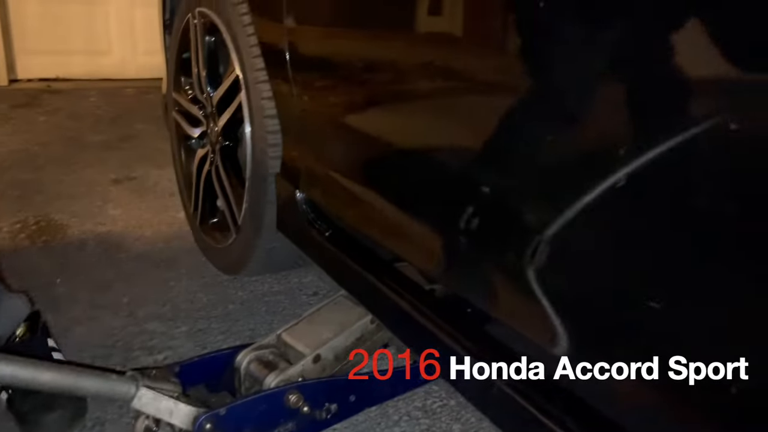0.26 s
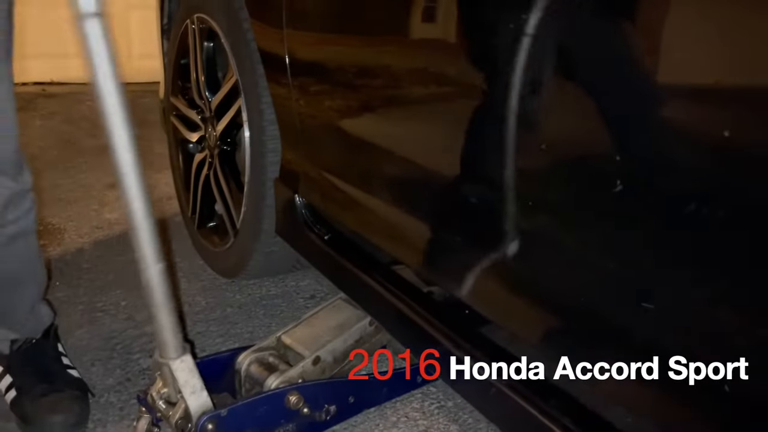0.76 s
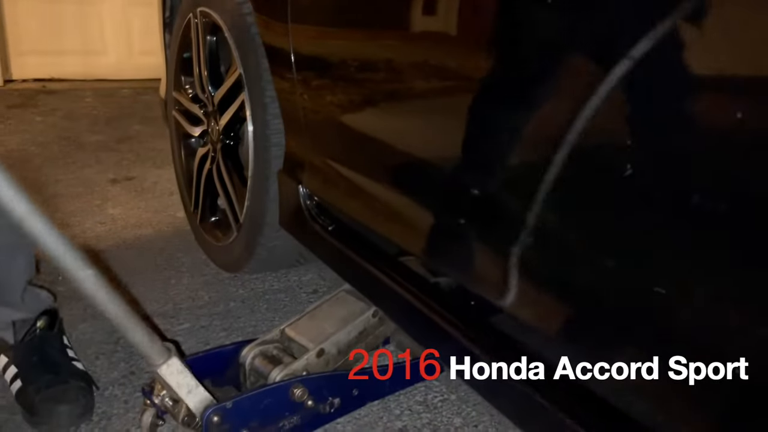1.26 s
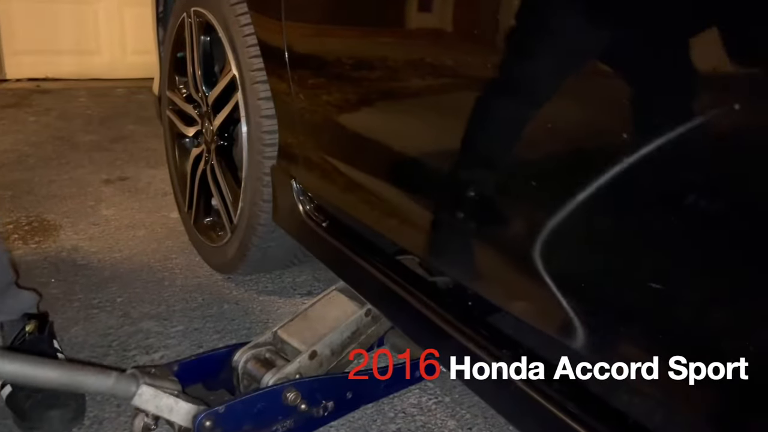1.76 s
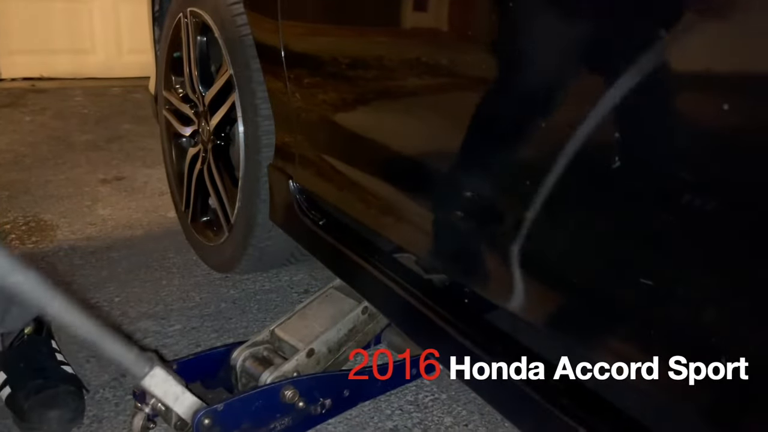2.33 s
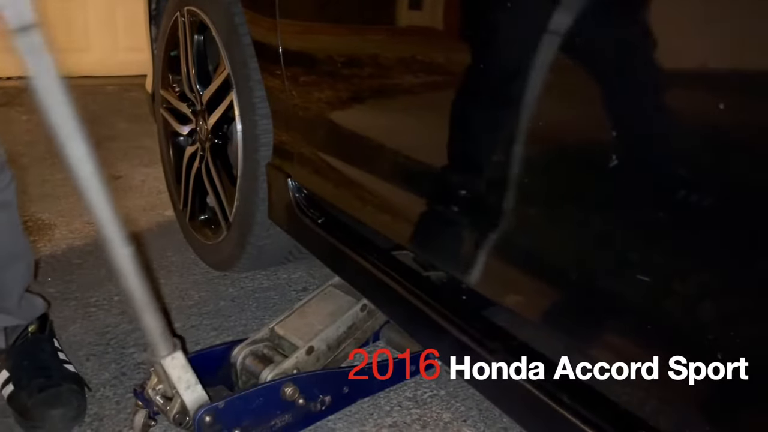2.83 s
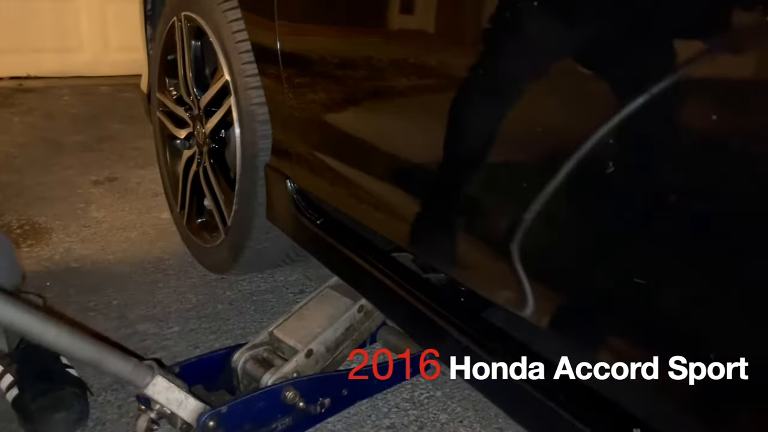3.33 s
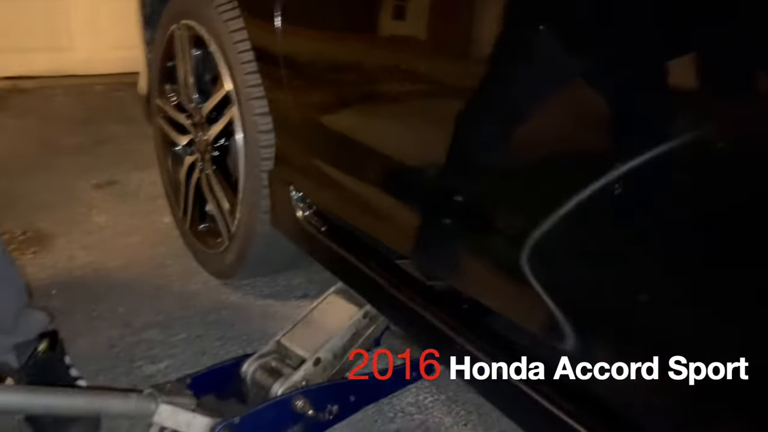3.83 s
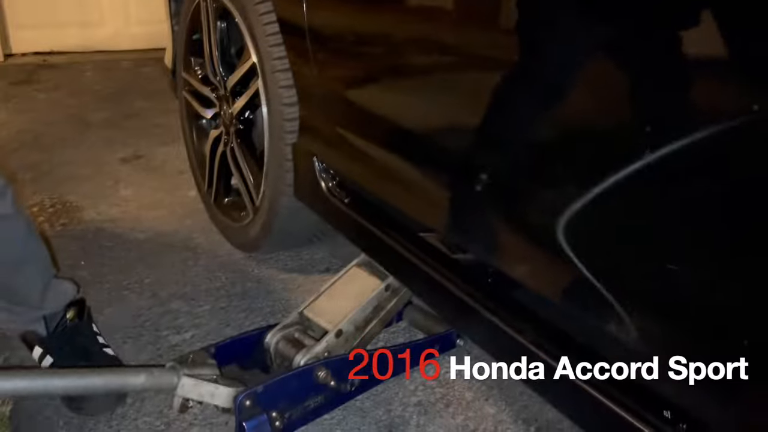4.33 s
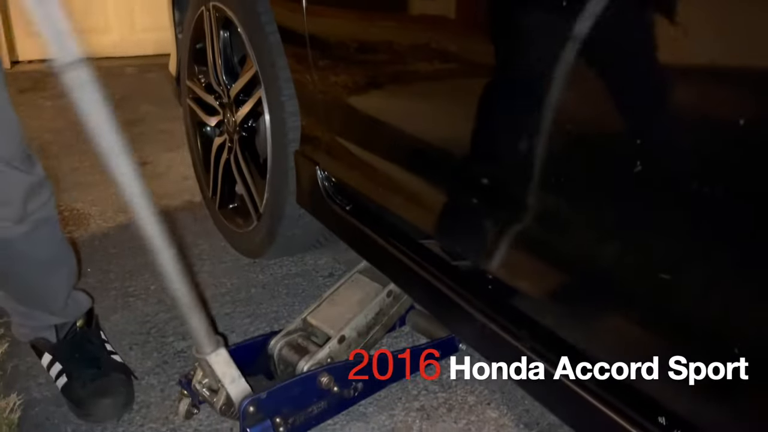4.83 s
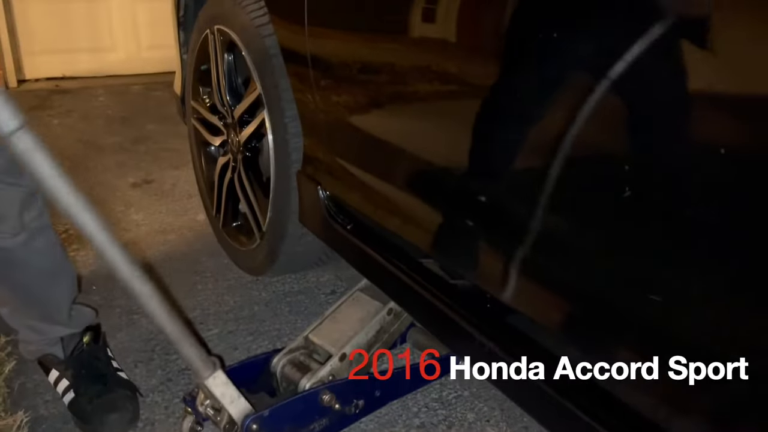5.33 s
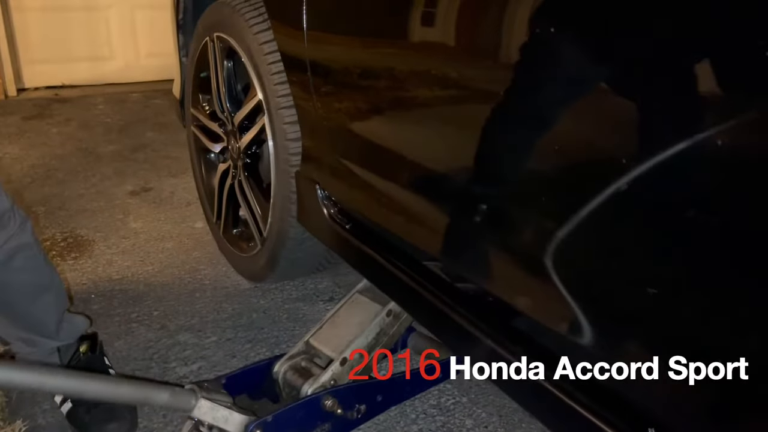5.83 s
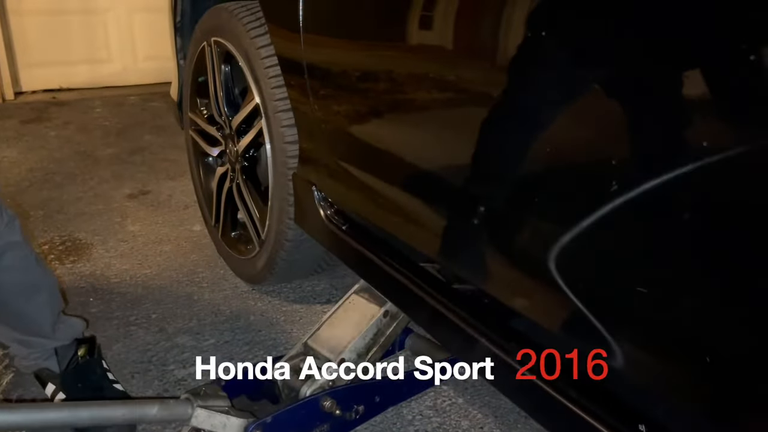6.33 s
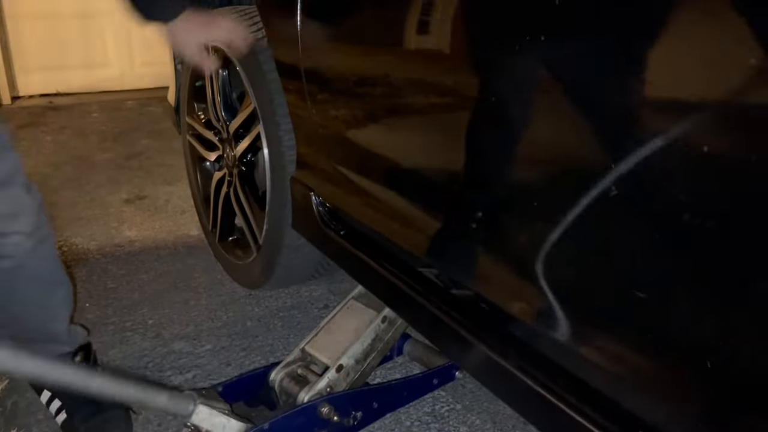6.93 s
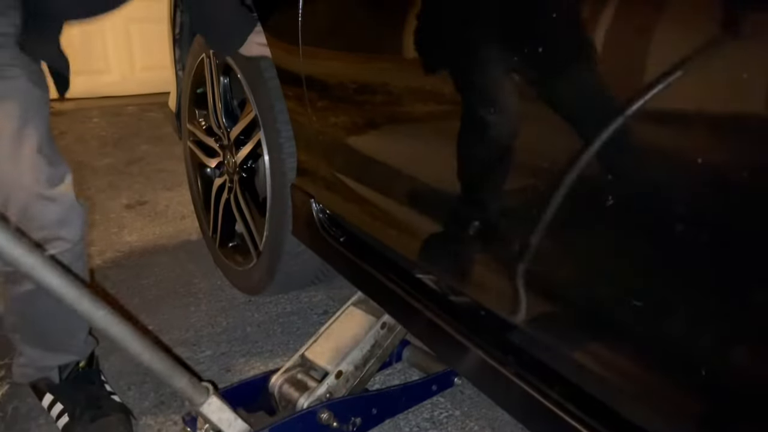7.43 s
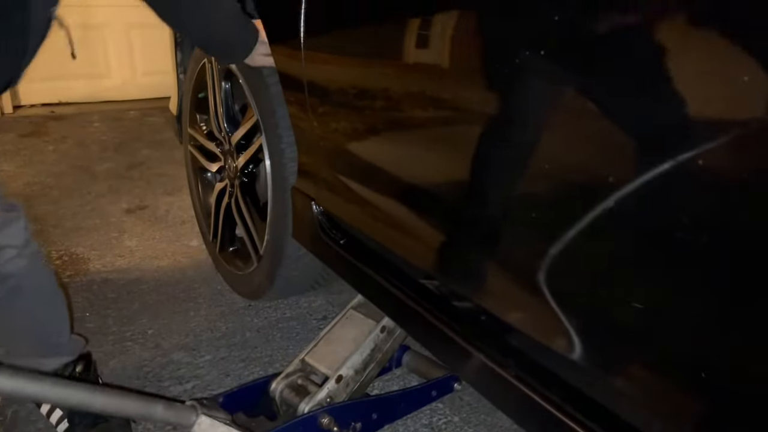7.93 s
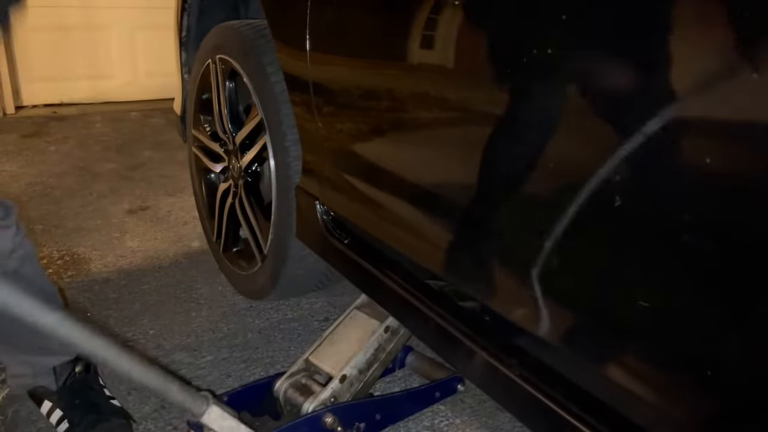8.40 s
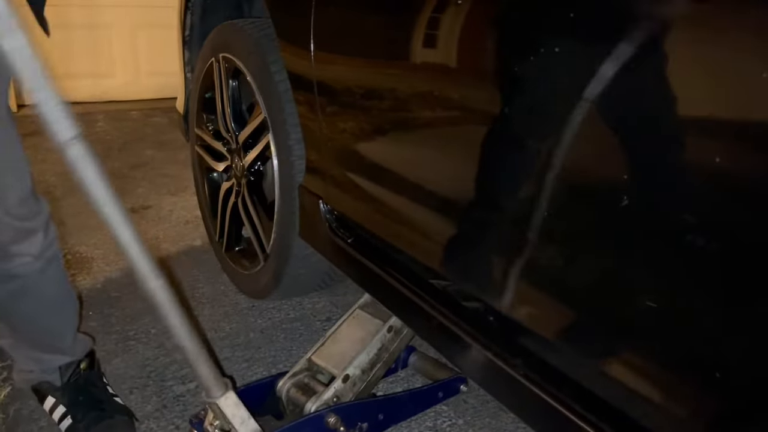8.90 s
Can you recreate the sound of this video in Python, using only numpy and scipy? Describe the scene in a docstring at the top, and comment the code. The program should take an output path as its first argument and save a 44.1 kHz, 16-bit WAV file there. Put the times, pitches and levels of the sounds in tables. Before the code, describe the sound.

Close metallic knocks, ticks and gritty oil hisses from a hand-pumped car jack, one heavy clank, then a shoe scraping on asphalt.

```python
"""A hydraulic floor jack is pumped under a car on a driveway, close by, over the far rumble of a town at night.
Its steel handle knocks and rings (noise bursts and decaying modes); once the saddle seats with a loud clank.
Oil hisses and spurts through the valves (grainy filtered noise), and the linkage ticks, clinks and pings.
Near the end a shoe grinds on gritty asphalt. The driveway adds a faint tail; the microphone dulls the top."""
import sys
import numpy as np
from scipy import signal
from scipy.fft import rfft, irfft, next_fast_len
from scipy.io import wavfile
from scipy.ndimage import uniform_filter1d

SR = 44100
rng = np.random.default_rng(int(sys.argv[2]) if len(sys.argv) > 2 else 0)


def dump_mix(stems):
    """Bounce the given channels to the path in sys.argv[1] as a 16-bit WAV at rate SR."""
    frames = np.atleast_2d(stems).T  # one column per channel
    limited = np.clip(frames, -1, 1)  # hard clip at full scale
    pcm = np.round(limited * 32767).astype(np.int16)
    wavfile.write(sys.argv[1], SR, pcm)


N = 403956
TIME = np.arange(N) / SR  # s, the whole scene
BLOW_TIME = np.arange(SR // 2) / SR  # s, half a second for one short sound


def undb(db):
    """Decibels to gain."""
    return 10 ** (np.asarray(db) / 20)


def unit(x):
    """Scale to rms 1."""
    return x / np.sqrt(np.mean(x ** 2))


def crest(x, size=180):
    """Scale a blow so that its loudest few milliseconds have rms 1."""
    power = uniform_filter1d(x.mean(0) ** 2, size)
    return x / np.sqrt(power.max())


def fade(t60):
    """Exponential decay by 60 dB in t60 seconds."""
    return np.exp(-np.log(1000) * BLOW_TIME / t60)


def swell(rise):
    """Soft onset with a time constant in seconds."""
    return 1 - np.exp(-BLOW_TIME / rise)


def colour(x, points, tilt_db=0):
    """Filter by (f/Hz, level/dB) points, tilted about the highest point by some dB an octave."""
    size = next_fast_len(x.shape[-1])
    octave = np.log2(np.maximum(np.fft.rfftfreq(size, 1 / SR), 1))
    hz, db = np.transpose(points)
    curve_db = np.interp(octave, np.log2(hz), db)
    # the tilt stops growing below the lowest point
    octaves_from_top = np.maximum(octave, np.log2(hz[0])) - np.log2(hz[-1])
    gain = undb(curve_db + tilt_db * octaves_from_top)
    return irfft(rfft(x, size) * gain, size)[..., :x.shape[-1]]


def noise(points, side_db, tilt_db=0, size=len(BLOW_TIME)):
    """Stereo noise of a given colour and side-to-mid level, closed off below its lowest point."""
    points = [(points[0][0] / 2, points[0][1] - 40), *points]
    mid, side = unit(colour(rng.standard_normal((2, size)), points, tilt_db))
    return mid + undb(side_db) * np.array([side, -side])


def pan(x, left_db):
    """Shift a sound to the left by a level difference between the channels."""
    return x * undb([[left_db / 2], [-left_db / 2]])


def walk(rate):
    """Random wander with rms 1, taking a new value some times a second."""
    k = int(SR / rate)
    steps = np.repeat(rng.standard_normal(N // k + 1), k)
    return unit(uniform_filter1d(steps, k)[:N])


def grain(depth_db, size=50, length=len(BLOW_TIME)):
    """Gain of a shower of uneven grains; size is the smoothing in samples (50 is about a millisecond)."""
    roughness = unit(uniform_filter1d(rng.standard_normal(length), size))
    return unit(undb(depth_db * roughness))


def add(out, s, sound):
    """Mix a sound in at a time in seconds."""
    i = int(s * SR)
    out[:, i:i + sound.shape[1]] += sound[:, :max(N - i, 0)]


def arch(start, length, power):
    """A movement that speeds up and slows down again, as a gain from 0 to 1."""
    progress = np.clip((TIME - start) / length, 0, 1)
    return np.maximum(np.sin(np.pi * progress), 0) ** power


def hold(start, length, attack, release):
    """Rise, hold until the length is over, release."""
    rise = np.clip((TIME - start) / attack, 0, 1)
    fall = np.clip(1 - (TIME - start - length) / release, 0, 1) ** 2
    return rise * fall


def ring(modes, scatter_db, spread, tilt_db=0, smear=1):
    """Struck steel: each blow weights the modes anew; a square blow (small smear) starts them nearly in step."""
    out = 0
    ears = np.array([[1], [-1]])
    for (hz, db, t60), (size, phase, lag) in zip(modes, rng.standard_normal((len(modes), 3))):
        angle = 2 * np.pi * (hz * BLOW_TIME + smear * phase) + spread * lag * ears
        gain = undb(db + scatter_db * size + tilt_db * np.log2(hz / modes[0][0]))
        out = out + gain * np.sin(angle) * fade(t60) * swell(.5 / hz)
    return crest(out)


# far town, low rumble: f/Hz, level/dB
RUMBLE_COLOUR = [(27, -45), (33, -12), (40, 1.5), (50, -0.5), (66, 1), (95, -1.5), (125, -2), (160, -8),
                 (200, -7.5), (260, -12.5), (330, -22), (420, -32), (600, -38), (1000, -72)]
# far roads, wide rush: f/Hz, level/dB
ROAD_COLOUR = [(200, -16.5), (400, -1.5), (550, -2.5), (800, 1.5), (1100, -2.5), (1500, -7), (2200, -13),
               (3000, -24.5), (4500, -34), (7000, -44), (12000, -55)]
# gain on the side signal of the town: f/Hz, level/dB
TOWN_WIDTH = [(60, -31), (110, -17.5), (200, -9), (350, -6), (630, -4), (1140, 2), (2060, -2.5), (3720, -4),
              (6700, -12), (12100, 17)]
# the rumble slowly recedes and wanders; the rush of the roads is steady
RUMBLE_DB, RUMBLE_FALL_DB_PER_S, RUMBLE_WANDER_DB, ROAD_DB = -29.5, 0.2034, 0.03, -43.5


def town():
    """Far-off noise: a low rumble, nearly alike in both channels, under the wide rush of far roads."""
    rumble_db = RUMBLE_DB - RUMBLE_FALL_DB_PER_S * TIME + RUMBLE_WANDER_DB * walk(1.99)
    rumble = noise(RUMBLE_COLOUR, side_db=-0.5, size=N) * undb(rumble_db)
    road = noise(ROAD_COLOUR, side_db=1, size=N) * undb(ROAD_DB)
    left, right = rumble + road
    mid = (left + right) / 2
    side = colour((left - right) / 2, TOWN_WIDTH)
    return pan(mid + np.array([side, -side]), left_db=.5)


def driveway(x):
    """Car body, ground and garage door return a faint, dull tail."""
    tail_colour = [(150, -17), (600, -2), (2500, -7.0), (10000, -18.0)]
    tail = noise(tail_colour, side_db=-3.5) * swell(0.0056) * fade(0.12)
    tail /= np.sqrt(np.sum(tail ** 2) / 2)
    return x + undb(-17.0) * signal.fftconvolve(x, tail, axes=1)[:, :N]


# the sole slips and crushes grit: t/s, level/dB, t60/s
SLIPS = [(7.713, -45, 0.042), (7.775, -39.5, 0.038), (7.822, -33.5, .05), (7.838, -34, 0.026),
         (7.850, -31, 0.029), (7.963, -47.5, 0.1), (8.021, -33.5, 0.072), (8.115, -37.5, 0.048),
         (8.217, -47.5, 0.11)]
# grit under the sole: f/Hz, level/dB
GRIT_COLOUR = [(1200, -0.5), (2600, 3), (3300, -0.5), (3650, 1), (3900, 1), (4250, 4.5), (4650, 8.5),
               (4850, -10), (5120, 2), (5350, -6), (5900, -8), (7200, -8), (7900, 0.5), (8350, -8),
               (8900, -1.5), (11000, -12), (13000, -2.5)]
# the sole drags over grit
DRAG_S, DRAG_LENGTH_S, DRAG_DB, DRAG_ARCH = 7.69, 0.4, -52.5, 0.38


def shoe():
    """The sole drags over the asphalt, and each slip crushes a shower of grains."""
    drag = noise(GRIT_COLOUR, side_db=-4, size=N)
    drag = drag * grain(depth_db=2.5, size=90, length=N) * undb(3.3 * walk(45))
    out = drag * undb(DRAG_DB) * arch(DRAG_S, DRAG_LENGTH_S, DRAG_ARCH)
    for s, db, t60 in SLIPS:
        slip = noise(GRIT_COLOUR, side_db=-4) * grain(depth_db=1.0, size=70)
        add(out, s, undb(db) * crest(slip * swell(0.0013) * fade(t60)))
    return pan(out, left_db=2.0)


# the handle is raised and the pump draws oil:
# start t/s, length t/s, relative hiss level/dB, valve whistle level/dB
LIFT_STROKES = [(0.276, 0.89, -68, -74), (2.073, 1, -71.5, -73), (4.22, 0.44, -68, -83),
                (4.638, .38, -70.5, -67.5), (6.35, 0.2, -69, -62.5), (6.684, 0.16, -69, -62),
                (6.84, 0.6, -67.5, -81), (8.28, 0.47, -69, -60.5)]
# the handle is pushed down and the pump delivers oil: start t/s, length t/s, relative hiss level/dB
PUSH_STROKES = [(0.0, 0.25, -72), (1.2, 0.96, -75.5), (2.998, 0.59, -57), (5.1, 0.46, -69),
                (5.62, 0.27, -62.5), (7.58, 0.71, -68.5), (8.826, 0.36, -67.5)]
PUSH_ATTACK_S, PUSH_RELEASE_S = 0.072, 0.19
LIFT_ARCH, WHISTLE_ARCH = 0.36, 2.4  # hiss and whistle follow these powers of the handle's speed
SEEP_DB = -78.5  # relative level of the faint flow between strokes


def flow():
    """Strength of the oil flow: it swells with each lift and holds steady under each push."""
    drawn = sum(undb(db) * arch(s, length, LIFT_ARCH) for s, length, db, _ in LIFT_STROKES)
    pushed = sum(undb(db) * hold(s, length, PUSH_ATTACK_S, PUSH_RELEASE_S) for s, length, db in PUSH_STROKES)
    return np.hypot(drawn + pushed, undb(SEEP_DB))


def crackle(count=90):
    """Grit shifts under the jack's wheels in random specks, louder while oil is flowing."""
    out, effort = np.zeros((2, N)), flow()
    for when, size, pitch in rng.random((count, 3)):
        hz = 3800 * 3 ** pitch
        gain = effort[int(when * N)] * undb(5 + 11.6 * size ** 2)
        speck = noise([(hz / 2, -16), (hz, 0), (hz * 2.3, -12)], side_db=-7, size=2048)
        add(out, when * N / SR, gain * crest(speck * fade(0.011)[:speck.shape[1]]))
    return out


# oil hiss: f/Hz, level/dB
HISS_COLOUR = [(1760, -40), (3000, -6), (4270, -4), (5330, -5), (7500, -5.5), (8150, -1), (9240, 0),
               (10100, -10), (11200, -2), (12500, -20), (16300, -46), (22000, -120)]


def oil():
    """Oil fizzes through the pump, and a narrow valve whistles around the middle of each lift."""
    fizz = grain(depth_db=1.5, length=N) * undb(1.4 * walk(30))
    hiss = noise(HISS_COLOUR, side_db=-1.5, size=N) * fizz * flow() * undb(2.5)
    whistle_colour = [(6850, -25), (7090, -2), (7350, -19), (7700, -15), (8200, -10), (9000, -32)]
    whistle = noise(whistle_colour, side_db=-8, size=N)
    suction = sum(undb(db) * arch(s, length, WHISTLE_ARCH) for s, length, _, db in LIFT_STROKES)
    return pan(hiss + whistle * suction * undb(2.3 * walk(40)), left_db=1.5)


# the dry piston seal rubs: start t/s, length t/s, level/dB
SEAL_RUBS = [(4.046, 0.14, -51), (4.244, 0.061, -51.5)]
# seal: f/Hz, level/dB
SEAL_COLOUR = [(2600, -18), (4900, -17), (5400, -6), (5900, -14), (7300, -15), (8000, 3), (8500, -4),
               (9300, -5), (10300, -10), (11050, 3), (11900, -8), (13000, -22)]
RUB_ARCH = 0.98


def seal():
    """Fine stick and slip of the seal: a thin, squeaky hiss."""
    rubbing = sum(undb(db) * arch(s, length, RUB_ARCH) for s, length, db in SEAL_RUBS)
    return noise(SEAL_COLOUR, side_db=-3, size=N) * grain(depth_db=0.5, length=N) * rubbing


# the oil wheezes as the hardest push ends, and dies away
WHEEZE_S, WHEEZE_DB, WHEEZE_RISE_S, WHEEZE_T60_S = 3.62, -49, .07, 0.59


def wheeze():
    """A narrow, sputtering hiss while the flow dies away."""
    out = np.zeros((2, N))
    hiss = noise([(4000, -14), (4900, -8), (5400, -7), (5950, -4), (6500, -15), (8000, -25)], side_db=-8)
    sputter = hiss * grain(depth_db=5.5, size=200)
    add(out, WHEEZE_S, undb(WHEEZE_DB) * sputter * swell(WHEEZE_RISE_S) * fade(WHEEZE_T60_S))
    return out


# oil spurts through the check valve:
# t/s, relative level/dB, brightness/dB per octave, squeak of the ball relative to the jet level/dB
VALVE_SPURTS = [(0.101, -42, 2.5, -5), (1.2102, -33.5, 6, 0), (1.272, -38, -1, -15), (1.363, -42, 0, -8),
                (1.427, -37.5, 1, -7), (1.4957, -39, 0.3, -5), (1.5545, -36, 0, -5),
                (1.585, -37.5, -2, -13), (1.652, -39.5, -1, -8), (1.766, -32.5, 2.5, -2),
                (1.842, -36.5, -0.5, -4.5), (1.939, -33, -1.5, -6), (3.0208, -28.5, -0.5, -4),
                (3.066, -32, -5, -6), (3.497, -30, -2.5, -9), (3.6165, -30.5, 4, 4), (4.166, -30, -2, -10),
                (5.728, -32.5, -0.5, -5)]
# jet of oil: f/Hz, level/dB
JET_COLOUR = [(1200, 3), (2200, 4), (2800, 3.5), (4500, 1.5), (6500, -5), (9000, -2.5), (11500, -8),
              (13000, -29)]


def spurts():
    """The check valve passes short gritty spurts, and its ball buzzes with a thin squeak."""
    out = np.zeros((2, N))
    chances = rng.standard_normal(len(VALVE_SPURTS))
    for (s, db, tilt_db, squeak_db), chance in zip(VALVE_SPURTS, chances):
        hz = 2880 * (1 + 0.012 * chance)
        # two narrow bands
        squeak_colour = [(hz * .79, -30), (hz * .84, -1), (hz * .9, -26), (hz, 0), (hz * 1.05, -30), (hz * 2, -55)]
        squeak = noise(squeak_colour, side_db=-6)
        jet = noise(JET_COLOUR, side_db=-2.0, tilt_db=tilt_db) * grain(depth_db=0.5)
        spurt = jet * fade(0.13) + undb(squeak_db) * squeak * fade(0.14)
        # starts early to leave room for the soft onset
        add(out, s - .003, undb(db - 10.0) * crest(spurt * swell(0.0048) ** 2))
    return pan(out, left_db=2.5)


# the return spring pings
PING_S, PING_HZ, PING_DB = 2.799, 7100, -46


def spring():
    """One thin, high ring: a single decaying sine."""
    out = np.zeros((2, N))
    ping = np.sin(2 * np.pi * PING_HZ * BLOW_TIME) * swell(.004) * fade(0.15)
    add(out, PING_S, undb(PING_DB) * np.tile(ping, (2, 1)))
    return out


# pins and spring tick: t/s, relative level/dB, centre f/Hz
LINKAGE_TICKS = [(0.3083, -42.5, 11700), (1.186, -36.5, 4340), (1.2204, -36.5, 6580), (2.1095, -38, 3340),
                 (2.1255, -39, 10900), (2.3624, -51, 4240), (2.4594, -47, 11000), (2.5691, -48.5, 3360),
                 (2.7871, -44.5, 7540), (2.8438, -30.5, 3200), (2.98, -37, 4230), (3.018, -34, 6500),
                 (3.5498, -42, 3480), (4.4124, -47, 11100), (4.622, -42.5, 4000), (5.023, -41.5, 5200),
                 (5.081, -32.5, 3600), (5.0977, -29, 8500), (5.3218, -47.5, 8950), (5.659, -43, 7840),
                 (5.686, -43, 7750), (5.8517, -40, 5400), (5.8803, -42, 7990), (6.0816, -54, 4350),
                 (6.783, -35, 11200), (6.859, -46, 7940), (7.23, -40.5, 9600), (8.31, -46, 11300),
                 (8.599, -48.5, 4500), (9.1176, -49, 11000)]


def ticks():
    """Small hard contacts, each with one broad resonance and a very short ring."""
    out = np.zeros((2, N))
    for s, db, hz in LINKAGE_TICKS:
        body = [(hz / 4, -20), (hz / 1.07, -10), (hz, 0), (hz * 1.11, -7), (hz * 1.6, -16)]
        decay = fade(0.02) + undb(-17.5) * fade(0.16)
        tick = crest(noise(body, side_db=-3.5) * swell(0.00048) * decay)
        add(out, s, undb(db - 1.5) * tick)
    return pan(out, left_db=2.0)


# the pump roller clinks on its pin: t/s, relative level/dB, brightness/dB per octave
ROLLER_CLINKS = [(.281, -39.5, -6), (.287, -39.5, -12), (.308, -44, -12), (2.108, -34, -26),
                 (6.754, -38, 8), (6.783, -49, 0)]
# roller: f/Hz, level/dB, t60/s
ROLLER_RING = [(2140, 6, 0.038), (2316, 1, 0.049), (2540, -24, 0.031), (3320, -3.5, 0.036),
               (3656, 1, 0.034), (4160, -12, 0.03), (5630, -19, .03)]
# clack of a metal contact, here and in the handle socket: f/Hz, level/dB
SOCKET_COLOUR = [(500, 6), (900, 1.5), (1400, -4), (1900, 8), (2700, 0), (3400, -7), (4400, -11),
                 (5200, -18.5), (9000, -22), (11200, -22), (12500, -50)]


def roller():
    """The small roller rattles on its pin with a short, high ring."""
    out = np.zeros((2, N))
    for s, db, tilt_db in ROLLER_CLINKS:
        contact = crest(noise(SOCKET_COLOUR, side_db=-1, tilt_db=4.0) * fade(0.04))
        body = ring(ROLLER_RING, scatter_db=1.0, spread=0.32, tilt_db=tilt_db)
        add(out, s, undb(db + 2.0) * (body + .5 * contact))
    return out


# saddle and lifting arm: f/Hz, level/dB, t60/s
ARM_RING = [(733, -1, 0.1), (975, -16, 0.15), (1149, -7, 0.11), (1345, -9, 0.062), (1504, 0, 0.065),
            (1630, -11, 0.077), (2074, 0, 0.053), (2240, -7, 0.09), (2650, -5.5, 0.079), (2920, -12, 0.045),
            (3080, -12, .06), (3960, -16, 0.069), (4330, -16, .06), (4350, -14, .06)]
# sill and floor of the car: f/Hz, level/dB, t60/s
SILL_RING = [(125, -4.5, 0.25), (164.6, -1, 0.13), (226, -7, 0.12), (291, -7.5, 0.13), (318, -13, .1),
             (403, -6, 0.1), (464, -11, 0.26), (493, -3, 0.051), (563, -8, 0.15), (611, -0.5, 0.087),
             (664, -7, 0.079), (722, 0, 0.083), (830, -20, 0.13)]
# steel on steel: f/Hz, level/dB
CRACK_COLOUR = [(180, -30), (300, -4.5), (676, -2), (1170, -9.5), (1520, -4), (1920, -13), (2180, -9.5),
                (4620, -20.5), (11200, -40.5), (12500, -44), (16300, -74), (22000, -120)]
# the car's weight: f/Hz, level/dB
THUD_COLOUR = [(70, -22), (110, -11), (150, 15), (205, -2), (290, 7.5), (360, 2), (440, 0), (560, 9.5),
               (720, -2), (850, 1), (1050, -26), (2000, -39)]
# the saddle seats under the car; the level scales the whole clank
CLANK_S, CLANK_DB = 3.242, -7


def clank():
    """Steel cracks on steel and the arm rings; a moment later the car's weight thuds down and its sill rings."""
    out = np.zeros((2, N))
    crack = crest(noise(CRACK_COLOUR, side_db=-7) * swell(0.0035) * fade(0.033))
    arm = ring(ARM_RING, scatter_db=0.5, spread=0.28)
    sill = ring(SILL_RING, scatter_db=.2, spread=.25, smear=.11)
    thud = crest(noise(THUD_COLOUR, side_db=-16) * swell(.002) * fade(0.086))
    add(out, CLANK_S, pan(undb(-4.0) * crack + undb(-8.5) * arm, left_db=2.5))
    add(out, CLANK_S + 0.00724, undb(-4.5) * sill)
    add(out, CLANK_S + .002, undb(-2.0) * thud)
    return out * undb(CLANK_DB)


# the handle takes up its play: t/s, tube level/dB, frame level/dB, brightness/dB per octave
HANDLE_KNOCKS = [(1.0128, -25, -29.5, -1), (2.786, -48, -37, 0), (2.843, -20.5, -25, 0.5),
                 (4.359, -34, -35, 6), (4.368, -38, -50, 4), (4.622, -44.5, -44.5, 3),
                 (5.080, -48, -27.5, 4), (5.097, -32.5, -35, 6.5), (5.147, -21, -24, 1),
                 (5.659, -34, -48, -3.5), (5.757, -40, -48, -2), (6.755, -37, -39, 3),
                 (6.782, -35, -48, -1), (7.228, -46, -39.5, 2), (7.4457, -31, -31.5, -4.5),
                 (8.217, -41, -38, 1), (8.951, -24, -29, -2)]
# handle and socket: f/Hz, level/dB, t60/s
HANDLE_RING = [(790, -11, .06), (872, -8, .07), (1010, -13, .07), (1170, -9, .07), (1450, -11, .06),
               (1865, 4, .065), (2030, -6, .06), (2300, -8, .05), (2490, -2, .06), (2660, -5, .06),
               (3050, -7, .06), (3690, -14, .04), (4220, -11, .04)]
# heavy frame of the jack: f/Hz, level/dB
FRAME_COLOUR = [(290, -21), (360, -4.5), (415, 7), (490, -3), (590, -34), (720, 0), (880, -6.5),
                (1150, -11.5), (1500, -15.5), (2800, -28), (5000, -47.5)]
SOCKET_DB, TUBE_DB, FRAME_LAG_S = 3, -1.5, .005  # shares of the clack and the ring; delay of the jolt


def handle():
    """The loose tube clacks in its socket and rings; the jolt reaches the heavy frame a moment later."""
    out = np.zeros((2, N))
    for s, tube_db, frame_db, tilt_db in HANDLE_KNOCKS:
        contact = noise(SOCKET_COLOUR, side_db=-2.5, tilt_db=tilt_db)
        contact = crest(contact * swell(0.00097) * fade(0.024))
        tube = ring(HANDLE_RING, scatter_db=1.5, spread=0.22, tilt_db=tilt_db)
        frame = crest(noise(FRAME_COLOUR, side_db=-18) * swell(0.0011) * fade(0.092))
        knock = crest(undb(SOCKET_DB) * contact + undb(TUBE_DB) * tube)
        add(out, s, undb(tube_db) * pan(knock, left_db=4))
        add(out, s + FRAME_LAG_S, undb(frame_db) * pan(frame, left_db=1.5))
    return out


def scene():
    """The jack and the shoe close by on the driveway, the town far behind."""
    steel = clank() + handle() + roller() + spring() + ticks()
    pump = oil() + spurts() + seal() + wheeze()
    return driveway(steel + pump + shoe() + crackle()) + town()


# microphone port, with its null in the treble: f/Hz, level/dB
PORT_COLOUR = [(9500, -2), (9900, -8.5), (10200, -19), (10600, -5.5), (10900, 2.5), (12000, -7),
               (13000, -19)]
TOP_HZ = 12700


def record(dry):
    """The microphone port cuts a notch in the treble, loud peaks are rounded and the top is cut off."""
    rounded = np.tanh(colour(dry, PORT_COLOUR))
    low_pass = signal.ellip(8, .2, 70, TOP_HZ, fs=SR, output="sos")
    return signal.sosfilt(low_pass, rounded)


dry = scene()
out = record(dry)
dump_mix(out)
```